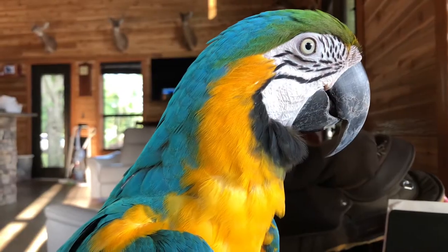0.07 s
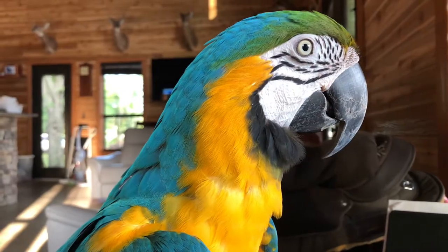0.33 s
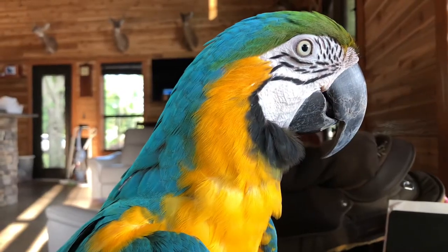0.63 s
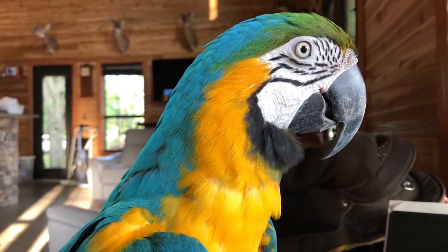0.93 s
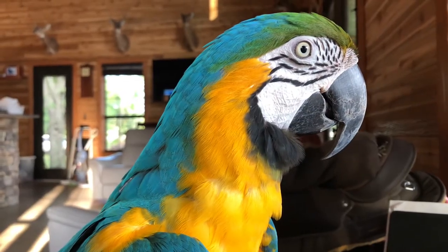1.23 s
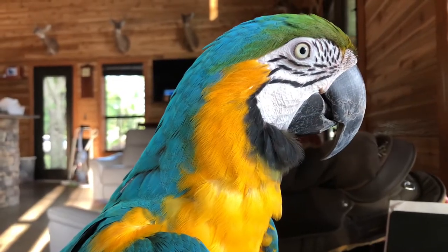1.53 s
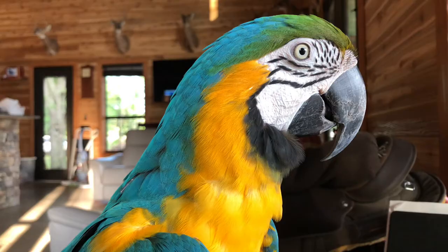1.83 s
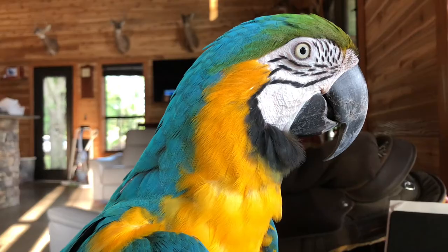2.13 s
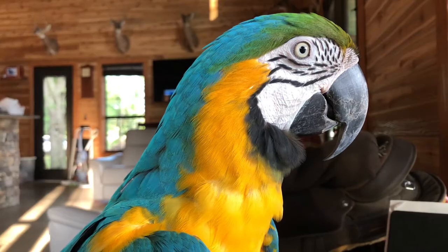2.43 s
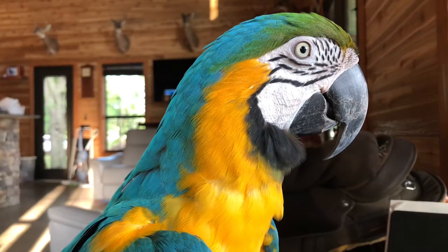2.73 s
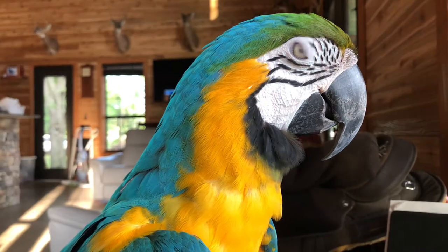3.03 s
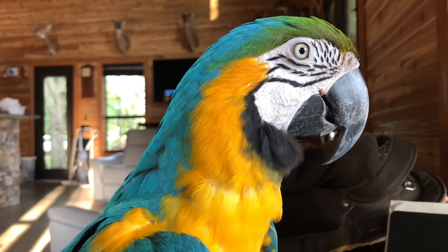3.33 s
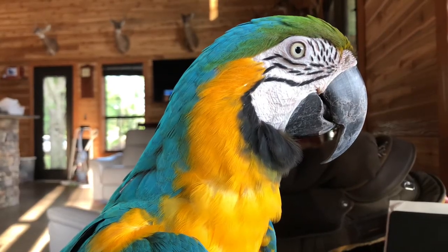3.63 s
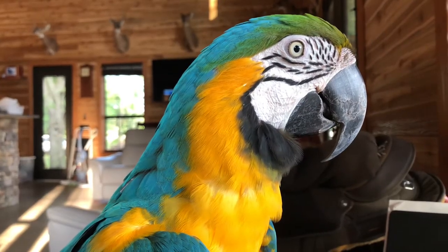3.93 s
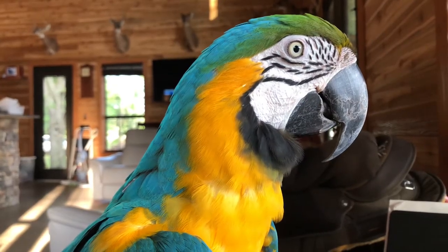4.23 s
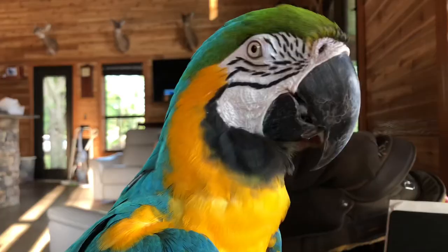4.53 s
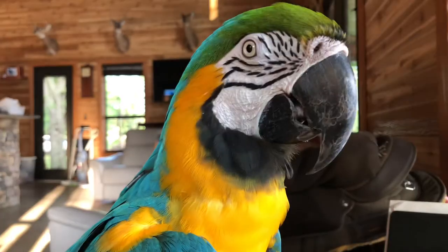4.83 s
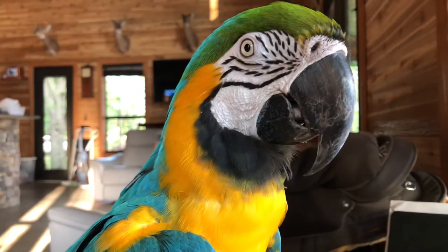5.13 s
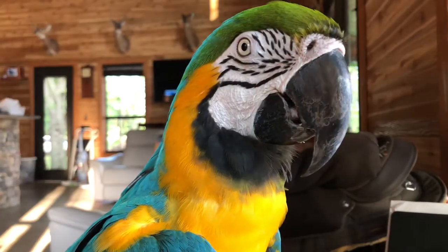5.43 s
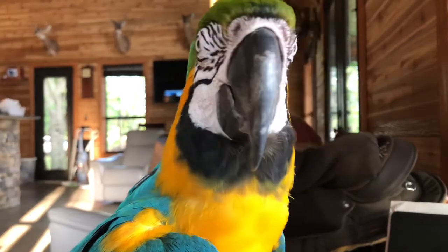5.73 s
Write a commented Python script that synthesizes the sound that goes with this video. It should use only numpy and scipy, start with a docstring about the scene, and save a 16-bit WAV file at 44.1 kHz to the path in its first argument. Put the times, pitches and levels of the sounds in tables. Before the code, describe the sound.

A faint appliance hum and soft hiss of air fill a quiet wood-panelled room. A few light taps sound at the very start. Then a macaw close to the microphone gives a harsh, growling squawk that softens into a groan. After a pause it squawks again, louder and faster, its voice breaking into brief clear squeaks. Both calls leave a slight echo.

```python
"""An appliance motor hums over a soft hiss of air in a quiet wood-panelled room that echoes faintly.
Right at the start, something taps lightly. At 1.7 s a macaw close by gives a harsh, growling squawk:
its voice box (the syrinx) slaps open and shut in short rattles, and each slap rings the throat and
beak and sinks in pitch. Near 5 s comes a louder, faster squawk that breaks into brief clear squeaks."""
import sys
import numpy as np
from scipy import signal
from scipy.fft import rfft, irfft
from scipy.io import wavfile
from scipy.ndimage import uniform_filter1d

SR = 44100
rng = np.random.default_rng(int(sys.argv[2]) if len(sys.argv) > 2 else 0)


def persist_wave(psi):
    """Save psi, clipped to +-1, as 16-bit WAV."""
    counts = np.round(np.clip(psi, -1, 1) * 32767).astype(np.int16)
    wavfile.write(sys.argv[1], SR, np.atleast_2d(counts).T)


N = 255339


def from_db(db):
    """Turns decibels into a number to multiply a sound by."""
    return 10 ** (np.asarray(db) / 20)


def unit(x):
    """Scales a signal to an average strength (rms) of 1."""
    return x / np.sqrt(np.mean(x ** 2) + 1e-20)


def look_up(table, hz):
    """Reads between a table's rows, with pitch spaced in octaves."""
    row_hz, value = np.transpose(table)
    return np.interp(np.log(hz + 1), np.log(row_hz + 1), value)


def add(mix, start_s, sound):
    """Mixes a sound in at the given time."""
    part = mix[max(round(start_s * SR), 0):][:len(sound)]
    part += sound[:len(part)]


def noise(colour, size):
    """Noise with the given colour, or balance of low and high pitches."""
    gain = from_db(look_up(colour, np.fft.rfftfreq(size, 1 / SR)))
    return unit(irfft(rfft(rng.standard_normal(size)) * gain, size))


def drift(rate_hz):
    """A smooth random wander, mostly slower than rate_hz."""
    hz = np.fft.rfftfreq(N, 1 / SR)
    return unit(irfft(rfft(rng.standard_normal(N)) * np.exp(-(hz / rate_hz) ** 2), N))


# Tones of the motor shaft and the mains power: multiple_of_base_pitch, level_db
SHAFT_TONES = [(2, -77.5), (4, -61), (5, -62), (6, -66.5), (7, -67), (8, -69), (9, -76.5), (11, -72)]
MAINS_TONES = [(1, -66), (2, -67.5), (3, -68.5), (4, -72.5), (5, -76)]

def motor_hum(shaft_hz=30.55, mains_hz=60.33):
    """Tones from a slightly wavering motor shaft throb against the mains hum."""
    out = np.zeros(N)
    for base_hz, tones, waver in ((shaft_hz, SHAFT_TONES, .003), (mains_hz, MAINS_TONES, .0005)):
        turns = np.cumsum(base_hz * (1 + waver * drift(1.46))) / SR
        for multiple, level_db in tones:
            height = np.sqrt(2) * from_db(level_db + 0.7 * drift(1.9))
            out += height * np.sin(2 * np.pi * (multiple * turns + rng.random()))
    return out


# Colours of the air's hiss and rumble: pitch_hz, gain_db
HISS_COLOUR = [(240, -16), (400, -6.5), (511, -5.5), (586, -1.5), (873, -1), (1120, -4), (1190, -2),
               (2150, -1), (2510, -5.5), (3010, -5), (5650, -14), (10300, -27.5), (15500, -34.5)]
RUMBLE_COLOUR = [(15, -25), (45, -2.5), (120, 6), (240, 3), (340, 1.5), (430, -12), (600, -36.5)]

def air(hiss_db=-59.5, rumble_db=-64):
    """A soft hiss with drifting louder and quieter patches, over a low rumble."""
    bands = signal.stft(noise(HISS_COLOUR, N), nperseg=1024, noverlap=768)[2]
    patches = uniform_filter1d(rng.standard_normal(bands.shape), size=7, axis=0)  # smooth over pitch
    patches = unit(uniform_filter1d(patches, size=22, axis=1))  # and over time
    hiss = signal.istft(bands * from_db(1.8 * patches), nperseg=1024, noverlap=768)[1][:N]
    return from_db(hiss_db + .5 * drift(36)) * unit(hiss) + from_db(rumble_db) * noise(RUMBLE_COLOUR, N)


# Light taps: start_s, level_db
TAPS = [(0.113, -46), (0.117, -45.5), (0.165, -53), (0.178, -53)]
# Colour of a tap: pitch_hz, gain_db
TAP_COLOUR = [(200, -20), (600, 4), (1050, 7), (1800, -1.5), (3000, -15), (7500, -14), (12000, -32),
              (16000, -32)]

def taps():
    """Small dry knocks: bursts of noise that die away almost at once."""
    out, t = np.zeros(N), np.arange(4096) / SR
    fade = np.exp(-t / 0.0034) + 0.15 * np.exp(-t / .022)
    for start_s, level_db in TAPS:
        add(out, start_s, from_db(level_db) * noise(TAP_COLOUR, len(t)) * fade)
    return out


# Time the echo takes to fall by 60 dB: pitch_hz, fade_s
ECHO_FADE = [(120, 1), (250, 0.98), (660, 0.71), (1740, 0.85), (4590, 0.71), (12000, 1)]
# Colour of the echo: pitch_hz, gain_db
ECHO_COLOUR = [(120, 8.5), (300, -15), (480, -3.5), (600, 5), (800, 1.5), (1200, 1), (3500, 1.5),
               (5500, -3.5), (8000, -4), (14000, -6)]
# Bounces off close surfaces: delay_s, gain_db
BOUNCES = [(.0034, -44), (.0061, -21), (.0083, -18), (0.0097, -32.5), (0.0137, -23), (0.0183, -36)]

def room_echo(sound, bounce_db, tail_db, bloom_db):
    """A few close bounces, a quick bloom of echoes off the furniture, then a fading tail."""
    t = np.arange(SR) / SR
    scatter = rng.standard_normal(SR) * (rng.random(SR) < .2)
    scatter *= np.clip((t - .005) / .008, 0, 1)  # echoes take a moment to arrive
    hz, age_s, bands = signal.stft(scatter, SR, nperseg=256)
    gain_db = look_up(ECHO_COLOUR, hz)[:, None] - 60 * age_s / look_up(ECHO_FADE, hz)[:, None]
    tail = signal.istft(bands * from_db(gain_db), SR, nperseg=256)[1][:SR]
    echo = from_db(tail_db + bloom_db * np.exp(-t / 0.015)) * tail / np.linalg.norm(tail)
    for delay_s, db in BOUNCES:
        add(echo, delay_s, from_db(bounce_db + db) * np.array([1, 2, 1]) / 4)  # a softened click
    return signal.oaconvolve(sound, echo)[:N]


def bump(hz, centre_hz, half_width_hz, db):
    """A hill of extra level around a pitch that rings."""
    return db / (1 + ((hz - centre_hz) / half_width_hz) ** 2)


def ring_after_hit(db):
    """Turns each row of dB gains into a filter that rings after a hit, never before it."""
    log_gain = np.concatenate([db, db[:, -2:0:-1]], axis=1) * np.log(10) / 20
    return np.exp(np.conj(signal.hilbert(log_gain, axis=1)))[:, :db.shape[1]]


def slap_times(slaps, rate_hz, fastest_at, slowing):
    """Slaps come fastest partway through a rattle and slow down as its air runs out."""
    progress = (np.arange(slaps - 1) + .5) / max(slaps - 1, 1)
    gaps = np.exp(slowing * (progress - fastest_at) ** 2)
    return np.append(0, np.cumsum(gaps) / gaps.sum() * (slaps - 1) / rate_hz)


def squawk(rattles, hardness, mouth, slap_colour, windpipe, *, throat_db, throat_width_hz,
           beak_db, beak_width_hz, muffle_db, voiced_db, strongest_at, swell, uneven_db, bite, thump,
           fastest_at, slowing, jitter, sink_s, sink_hz, rasp):
    """The voice box rattles; each slap rings the airway, and a harder one is sharper and fuller."""
    size, lead_s, puff_s = 2048, .002, .0008
    out, hz, t = np.zeros(N), np.fft.rfftfreq(size, 1 / SR), np.arange(size) / SR
    mouth_s, throat_hz, beak_hz = np.transpose(mouth)
    treble = hz ** 3 / (hz ** 3 + 2000 ** 3)
    fade = signal.windows.tukey(size, .06)
    # the low notes of a slap come last, so each one is a tiny falling chirp
    sink = np.exp(2j * np.pi * (sink_s * sink_hz * np.exp(-hz / sink_hz) - hz * lead_s))
    loudest_db = max(row[3] for row in rattles)
    for start_s, slaps, rate_hz, level_db in rattles:
        late, force, wobble = rng.standard_normal((3, slaps, 1))
        mid_hardness_db = np.interp(start_s + (slaps - 1) / rate_hz / 2, *np.transpose(hardness))
        rough = np.clip(1.44 + mid_hardness_db / 10, .45, 1)  # soft slaps run evenly, like a voice
        offset_s = slap_times(slaps, rate_hz, fastest_at, rough ** 2 * slowing)[:, None]
        slap_s = start_s + offset_s
        hard_db = np.interp(slap_s, *np.transpose(hardness))
        opening = np.clip(1 + 0.043 * (level_db - loudest_db), .2, 1)  # louder means a wider beak
        # the force swells and ebbs through the rattle
        progress = (np.arange(slaps)[:, None] + .5) / slaps
        force_db = rough * (uneven_db * force - swell * (progress - strongest_at) ** 2)
        force_db -= force_db.mean()
        # each slap jolts the airway a little out of tune
        jolted_hz = hz * (1 + .005 * rough * wobble)
        throat_now_hz = np.interp(slap_s, mouth_s, throat_hz) * (1 + 0.038 * rough * wobble)
        beak_now_hz = np.interp(slap_s, mouth_s, beak_hz) * (1 + 0.018 * rough * late)
        db = look_up(slap_colour, hz) + sum(bump(jolted_hz, *peak) for peak in windpipe)
        db += force_db + treble * (hard_db + bite * force_db)
        db += bump(hz, 280, 110, thump * force_db)
        db += bump(hz, throat_now_hz, throat_width_hz, throat_db * opening)
        db += bump(hz, beak_now_hz, beak_width_hz * (.6 + .55 * opening), beak_db)
        db += bump(hz, rate_hz, 45, voiced_db * (1 - rough))  # even slaps have a fuller lowest note
        db += bump(hz, 293, 240, muffle_db * (1 - opening))  # a half-shut beak favours low notes
        # a puff of swirling air follows each slap
        puff = rasp * rng.standard_normal((slaps, size)) * t / puff_s * np.exp(1 - t / puff_s)
        rings = fade * irfft(ring_after_hit(db) * sink * (1 + treble * rfft(puff)), size)
        rattle = np.zeros(round(offset_s.max() * SR) + 2 * size)
        uneven_s = offset_s + rough * jitter * late / rate_hz
        for ring_s, ring in zip(uneven_s.ravel(), rings):
            add(rattle, ring_s, ring)
        power = np.sum(rattle ** 2) / (slaps / rate_hz * SR)
        add(out, start_s - lead_s, from_db(level_db) * rattle / np.sqrt(power))
    return out


# Rattles of the voice box in each squawk: start_s, slap_count, slap_rate_hz, level_db
FIRST_RATTLES = [(1.7355, 1, 140, -39.5), (1.757, 7, 201.2, -38.5), (1.7993, 1, 140, -35),
                 (1.8088, 4, 156, -37), (1.844, 3, 113.7, -37.5), (1.8768, 3, 151.2, -33),
                 (1.903, 5, 172.6, -33), (1.9408, 8, 175.2, -31), (1.9912, 4, 159.5, -29.5),
                 (2.0226, 4, 163.1, -30), (2.0592, 3, 117.3, -31.5), (2.0872, 4, 154.3, -31),
                 (2.1185, 6, 151.7, -31), (2.1593, 4, 183.8, -27), (2.1846, 3, 169.7, -28),
                 (2.2066, 4, 154, -28), (2.2343, 4, 150.5, -30), (2.2617, 4, 142.9, -29),
                 (2.2898, 4, 199.2, -26.5), (2.3116, 5, 201.1, -26.5), (2.337, 6, 201, -27),
                 (2.3672, 14, 190.8, -31), (2.4412, 4, 152, -35.5)]
SECOND_RATTLES = [(4.953, 1, 140, -40.5), (4.9733, 1, 140, -32.5), (4.986, 5, 213.6, -34.5),
                  (5.0123, 5, 194.4, -34), (5.038, 5, 221.5, -30.5), (5.0595, 9, 293.3, -30.5),
                  (5.091, 2, 223, -33.5), (5.1012, 6, 250, -26.5), (5.1259, 6, 239.8, -26),
                  (5.151, 6, 239, -26.5), (5.1758, 7, 256.3, -26.5), (5.2066, 8, 280.6, -25.5),
                  (5.2475, 5, 265.5, -23.5), (5.266, 5, 272, -30), (5.285, 5, 253, -32.5),
                  (5.3082, 6, 255.3, -22), (5.3389, 8, 282, -20.5), (5.369, 6, 239.1, -24.5),
                  (5.394, 4, 254, -21.5), (5.4174, 7, 287, -20), (5.4435, 7, 268.3, -19.5),
                  (5.4705, 6, 223, -26)]
# How hard and bright the slaps are: time_s, treble_gain_db
FIRST_HARDNESS = [(1.735, -31), (1.761, -7.5), (1.801, 0.5), (1.88, 3), (2.1, -0.5), (2.345, -0.5),
                  (2.38, -7.5), (2.43, -10.5), (2.455, -16)]
SECOND_HARDNESS = [(4.953, -2), (5.03, -3), (5.11, 4.5), (5.29, 2), (5.37, 6.5), (5.48, 7.5)]
# Ringing pitches that move with tongue and beak: time_s, throat_hz, beak_hz
FIRST_MOUTH = [(1.73, 587, 3600), (1.9, 660, 3360), (2.03, 600, 3350), (2.17, 640, 3210), (2.33, 654, 3200),
               (2.47, 686, 3110)]
SECOND_MOUTH = [(4.95, 583, 3790), (5.1, 563, 3570), (5.25, 557, 3390), (5.35, 644, 3660),
                (5.43, 642, 3734), (5.5, 630, 3720)]
# Colour of one slap: pitch_hz, gain_db
FIRST_SLAP = [(60, -23), (130, -19), (200, -7), (350, -1), (900, -4), (1500, -9), (2300, -16.5),
              (3800, -25), (4700, -27.5), (6400, -26), (7600, -38.5), (12000, -42.5), (15500, -45)]
SECOND_SLAP = [(60, -69), (150, -17.5), (290, 1.5), (420, 1), (850, 2), (1500, -7.5), (2400, -16),
               (3100, -19), (5200, -25.5), (6600, -43), (8400, -41.5), (9500, -50), (15500, -50)]
# Steady peaks (+) and dips (-) of windpipe and mouth: pitch_hz, half_width_hz, gain_db
FIRST_WINDPIPE = [(1091, 94, 14.5), (1380, 150, 6.5), (1869, 93, 14.5), (2605, 64, 11.5), (2670, 71, -6),
                  (4200, 110, 12.5), (5090, 190, 9.5), (5525, 118, 18.5), (6830, 190, 10.5),
                  (7140, 180, -8), (8180, 160, 13), (9640, 120, 20), (10800, 150, 19.5), (11930, 320, 20),
                  (12700, 200, -16), (13250, 180, 10), (14500, 220, 13)]
SECOND_WINDPIPE = [(1042, 93, 11), (1222, 78, 12.5), (1593, 63, 7), (2000, 137, 13), (2640, 100, 4),
                   (3080, 84, -2.5), (4620, 130, 7.5), (5800, 180, 14), (7160, 1010, 15), (8530, 120, 6),
                   (10200, 260, 7), (12400, 450, 7), (13800, 450, 10)]

def macaw_squawks():
    """A slow, croaking squawk that softens into a groan, then a louder and faster one."""
    first = squawk(
        FIRST_RATTLES, FIRST_HARDNESS, FIRST_MOUTH, FIRST_SLAP, FIRST_WINDPIPE,
        throat_db=16.5, throat_width_hz=80, beak_db=21, beak_width_hz=174, muffle_db=21.5, voiced_db=9,
        strongest_at=0.46, swell=10, uneven_db=0.63, bite=0.55, thump=.3,
        fastest_at=0.2215, slowing=1.1, jitter=0.022, sink_s=0.0043, sink_hz=662, rasp=.045)
    second = squawk(
        SECOND_RATTLES, SECOND_HARDNESS, SECOND_MOUTH, SECOND_SLAP, SECOND_WINDPIPE,
        throat_db=16, throat_width_hz=62, beak_db=18, beak_width_hz=160, muffle_db=19.5, voiced_db=10,
        strongest_at=0.53, swell=19, uneven_db=0.67, bite=2.96, thump=2,
        fastest_at=.35, slowing=.25, jitter=.07, sink_s=0.00403, sink_hz=690, rasp=.065)
    return first + second


# Squeaks in the second squawk: start_s, length_s, start_pitch_hz, level_db
SQUEAKS = [(5.224, 0.018, 431, -29.5), (5.246, 0.016, 575, -26.5), (5.262, 0.0316, 568, -24),
           (5.287, 0.019, 437.5, -22), (5.336, .015, 593, -24.5), (5.362, 0.023, 582, -23.5),
           (5.379, 0.0167, 455, -23.5), (5.393, 0.025, 663, -22), (5.41, 0.024, 662, -23.5),
           (5.442, 0.044, 663.5, -26.5)]
# Colour the throat gives a squeak: pitch_hz, gain_db
SQUEAK_COLOUR = [(400, -18), (580, 1), (800, 4), (1150, -2.5), (1650, -10), (2100, -17.5), (2800, -26.5),
                 (3600, -28), (4500, -54), (6000, -41)]

def macaw_squeaks(end_hz=591.4, dip=0.054, waver=0.025, harmonics=10):
    """The voice box breaks into short clear tones that dip as they glide to one shared pitch."""
    out, multiple = np.zeros(N), np.arange(1, harmonics + 1)[:, None]
    for start_s, length_s, start_hz, level_db in SQUEAKS:
        progress = np.linspace(0, 1, round(length_s * SR))
        tremble = unit(uniform_filter1d(rng.standard_normal(len(progress)), size=90))
        glide_hz = start_hz + (end_hz - start_hz) * progress
        hz = glide_hz * (1 - dip * np.sin(np.pi * progress)) * (1 + waver * tremble)
        turns = multiple * np.cumsum(hz) / SR + rng.random((harmonics, 1))
        tones = from_db(look_up(SQUEAK_COLOUR, multiple * hz)) * np.sin(2 * np.pi * turns)
        fade = signal.windows.tukey(len(progress), .5)
        add(out, start_s, from_db(level_db) * unit(tones.sum(axis=0)) * fade)
    return out


def scene():
    """The room's steady sound, the taps farther off, then the bird close by."""
    background = motor_hum() + air()
    knocks = taps()
    far = knocks + room_echo(knocks, bounce_db=8, tail_db=-2, bloom_db=-5)
    bird = macaw_squawks() + macaw_squeaks()
    near = bird + room_echo(bird, bounce_db=-2, tail_db=-21.5, bloom_db=9)
    return (background + far + near)[None]


def record(dry):
    """Cuts away the very highest treble."""
    cutoff_hz = 15800
    low_pass = signal.firwin(511, cutoff_hz, window=("kaiser", 9), fs=SR)
    return signal.oaconvolve(dry, low_pass[None], "same")


dry = scene()
out = record(dry)
persist_wave(out)
```